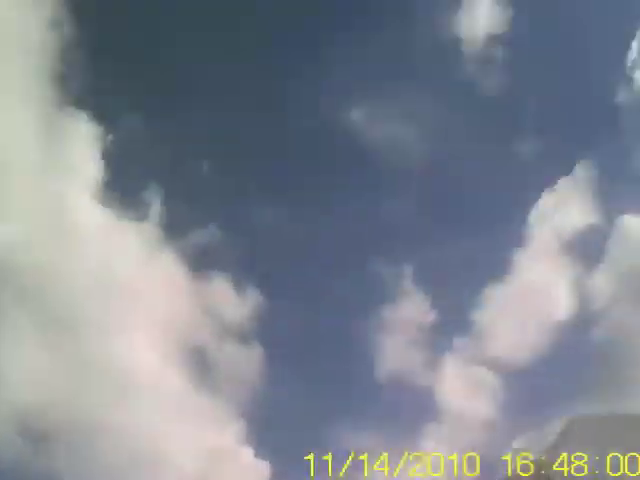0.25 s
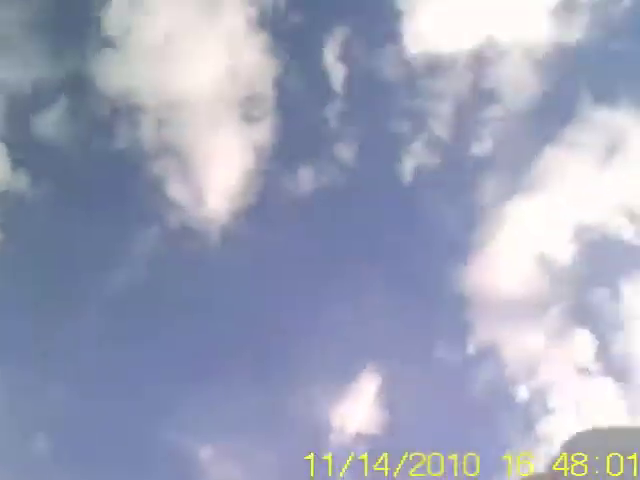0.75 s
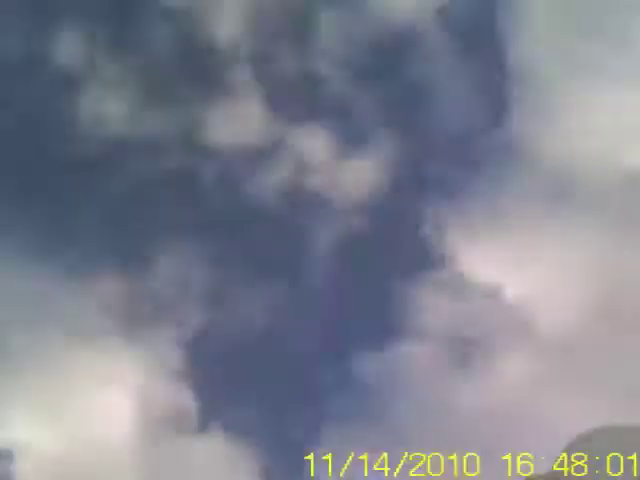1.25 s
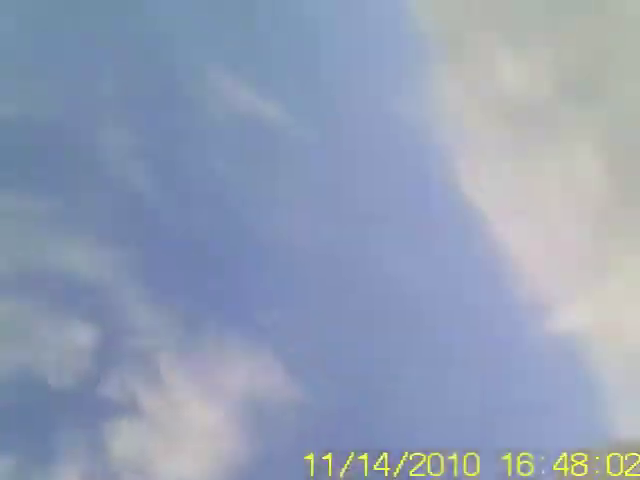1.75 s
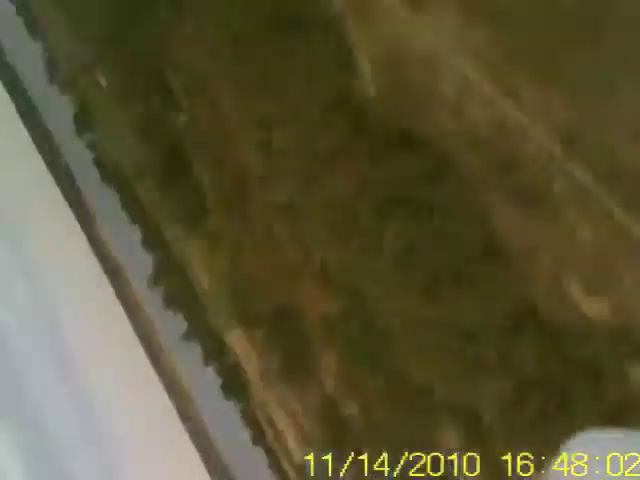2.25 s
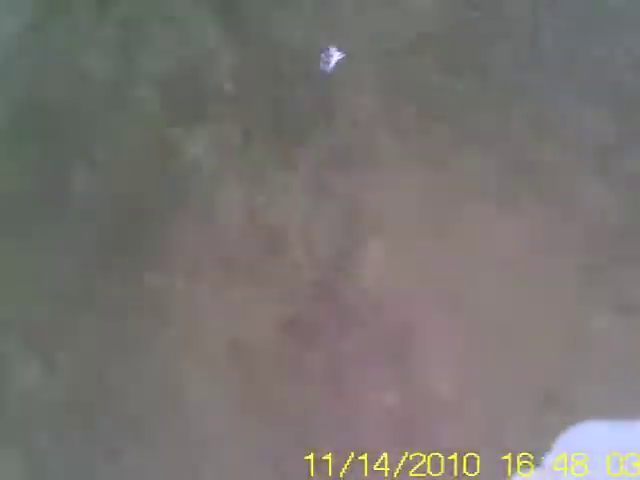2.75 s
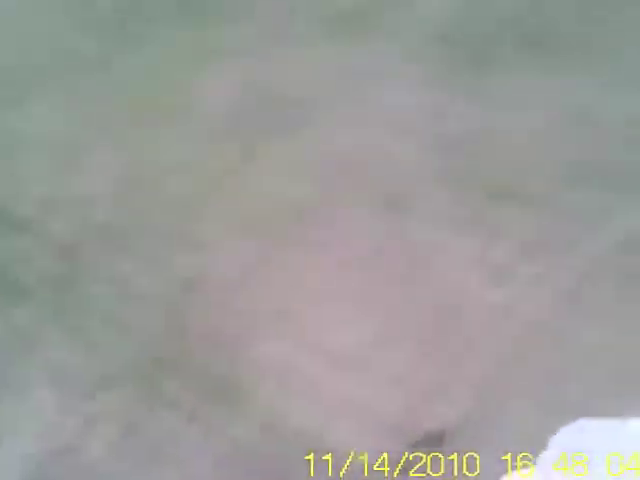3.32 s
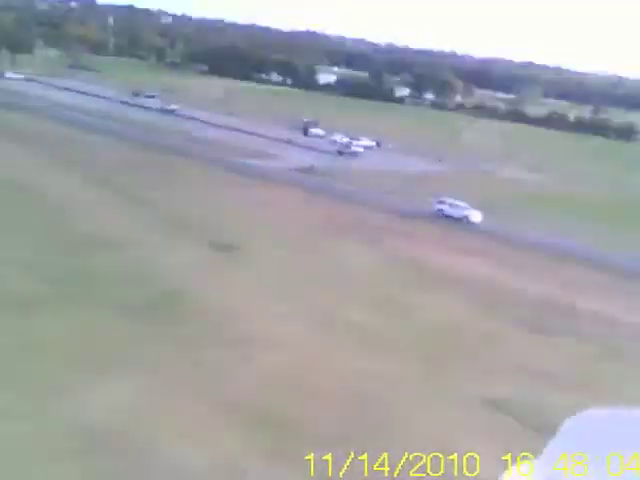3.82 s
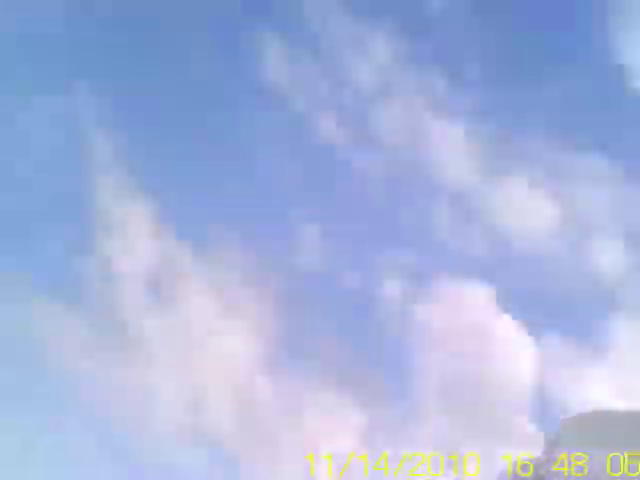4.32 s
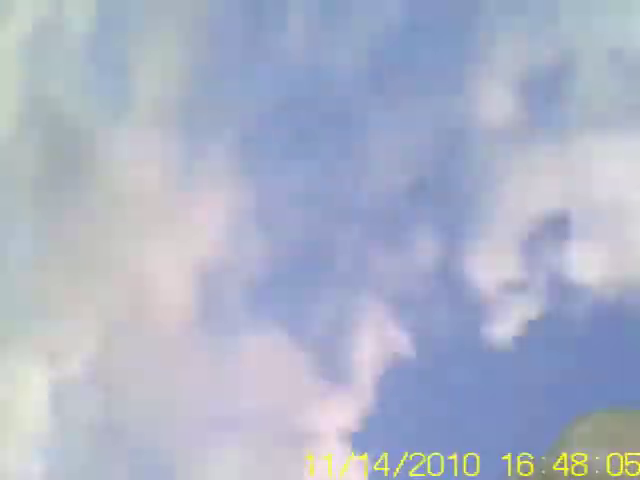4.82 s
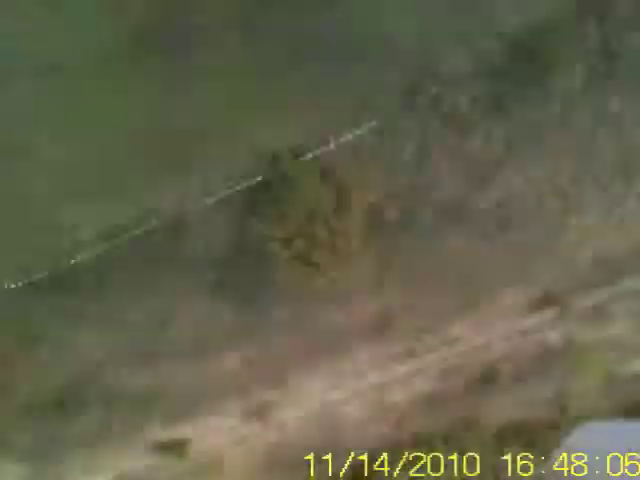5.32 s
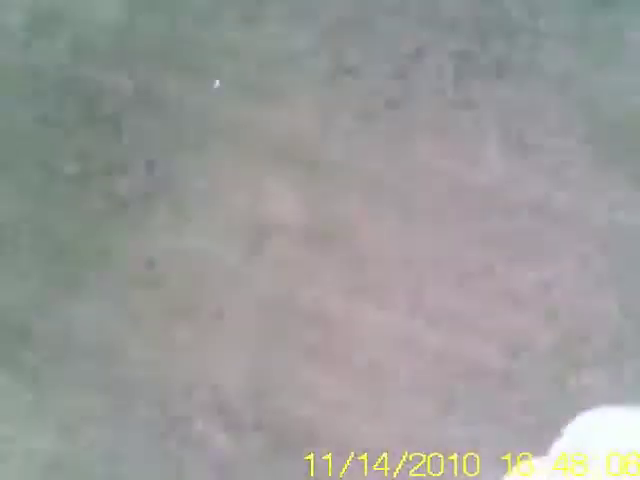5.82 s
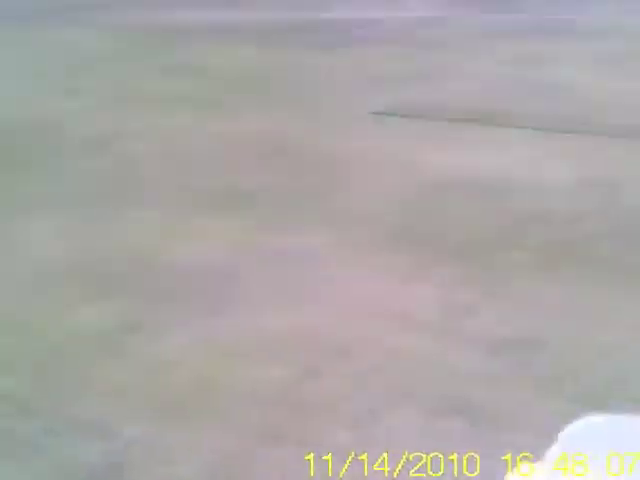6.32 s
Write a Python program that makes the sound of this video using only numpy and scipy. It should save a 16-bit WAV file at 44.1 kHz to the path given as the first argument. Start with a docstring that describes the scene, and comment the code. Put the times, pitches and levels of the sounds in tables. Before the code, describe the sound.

A small electric model plane's propeller whines at a steady pitch from the start, very close, with a hum beneath and a thin high tone above. The microphone rides on the aircraft in open air, with no echo. Wind rumbles and hisses over it, with soft thumps around 1 second. The wind eases near 2 seconds, then builds in a dive, with a faint airy whistle around 2.7 seconds. Gusts thump the microphone at about 3.1 and 3.4 seconds. At 3.5 seconds the whole sound abruptly drops to a faint whine and rush of air. It creeps up slowly from there but stays much quieter than the opening. Soft swells of wind and brief hollow moans of airflow pass between 4.5 and 5.5 seconds. The motor's pitch sags slightly near 6 seconds, then rises a little until the end at about 6.5 seconds.

```python
"""A two-blade propeller whines close by, its controller singing thinly: the microphone rides on a small
electric model jet flying loops in open air. Wind buffets the microphone and rushes over the airframe,
rising with airspeed in each dive; now and then an edge whistles or the flow breaks away and moans.
A gust hits halfway through; right after it the level drops abruptly, then creeps back as the motor runs."""
import sys
import numpy as np
from scipy import signal
from scipy.fft import rfft, irfft, next_fast_len
from scipy.io import wavfile

SR = 44100
rng = np.random.default_rng(int(sys.argv[2]) if len(sys.argv) > 2 else 0)


def digitize_waveform(pressure):
    """Quantize a signal to 16-bit integers and store it at the path in sys.argv[1].

    Rows of a 2-D input are taken as channels; values are limited to [-1, 1].
    """
    field = np.atleast_2d(pressure).T
    bounded = np.clip(field, -1, 1)
    quanta = np.round(bounded * 32767).astype(np.int16)
    wavfile.write(sys.argv[1], SR, quanta)


N = 289296
TIME = np.arange(N) / SR
CRUISE_AIRSPEED = 0.8  # airspeed is a share of the fastest dive


def from_db(db):
    """Decibels to gain."""
    return 10 ** (np.asarray(db) / 20)


def rms_one(x):
    """Scale to unit power."""
    return x / np.sqrt(np.mean(x ** 2) + 1e-20)


def in_time(rows):
    """A curve of (t/s, value), sample by sample."""
    return np.interp(TIME, *np.transpose(rows))


def swell(t, spread):
    """A bell-shaped rise and fall around time t."""
    return np.exp(-((TIME - t) / spread) ** 2 / 2)


def drift(rate_hz):
    """Slow random wander with a spread of one."""
    hop, settle = 40, 2000
    pole = np.exp(-2 * np.pi * rate_hz * hop / SR)
    white = rng.standard_normal(N // hop + settle + 2)
    slow = signal.lfilter([1], [1, -2 * pole, pole * pole], white)[settle:]
    return np.interp(np.arange(N) / hop, np.arange(len(slow)), rms_one(slow))


def turbulence(colour):
    """Noise of a given colour, unit power."""
    hz, db = np.transpose(colour)
    size = next_fast_len(N)
    bins = np.maximum(np.fft.rfftfreq(size, 1 / SR), 1)
    gain = from_db(np.interp(np.log(bins), np.log(hz), db))
    return rms_one(irfft(rfft(rng.standard_normal(size)) * gain, size)[:N])


def narrow_noise(hz, width_hz):
    """Noise gathered around a moving centre, unit power."""
    lowpass = signal.butter(2, width_hz / 2, fs=SR, output="sos")
    a, b = signal.sosfilt(lowpass, rng.standard_normal((2, N)))
    phase = 2 * np.pi * np.cumsum(hz) / SR
    return rms_one(a * np.cos(phase) + b * np.sin(phase))


# Balance on board: layer -> (level/dB at cruise, slope/dB per unit of airspeed)
SPEED_LAWS = {"whine": (-24.5, 1), "hum": (-31.5, 0), "overtones": (2.5, 8), "buffet": (-26.5, 27),
              "rush": (-35, 24), "wash": (-32, 13.5), "blade hiss": (-47, -6), "slipstream": (-47, 42)}

def level_db_at(layer, airspeed):
    """A layer's level at a given airspeed."""
    cruise_db, slope_db = SPEED_LAWS[layer]
    return cruise_db + slope_db * (airspeed - CRUISE_AIRSPEED)


# Partials trade places: shaft multiple -> (slope/dB per unit of airspeed, level/dB added at full throttle)
PARTIAL_LAWS = {1: (-6, -1), 2: (20.4, 0.75), 4: (-9, 2), 6: (12.2, 1.8), 7: (9.1, 11), 8: (6, 8.7),
                9: (-1.8, 6), 10: (-9, 2), 11: (8.5, -3), 12: (3.6, 0.5), 13: (8.4, 2), 14: (0, -26),
                16: (1, -8), 18: (1, 2.9), 20: (5, 9), 22: (7, 6), 24: (2, 4), 32: (-3, 1), 34: (-2, -2)}
# Some also swell and fade by themselves: shaft multiple -> rows of (t/s, added level/dB)
PARTIAL_SWELLS = {1: [(0, -2.5), (1, -0.5), (1.9, 1), (3.4, -1.5), (4.7, 2), (5.02, 5), (5.5, -3),
                  (5.8, 4.5), (6.56, -4)], 2: [(0, -2.5), (.8, -1), (1.6, 5), (2.45, -3.5), (3.2, 0),
                  (4.4, 2.5), (4.7, -4), (5.1, 5.5), (6, -7.5), (6.4, 1.5)], 3: [(0, 0.5), (1.2, 0.5),
                  (2.9, 2), (3.3, -13), (4.1, -6), (5.2, -5.5), (6.56, -3.5)], 4: [(0, 2.5), (1.6, -3),
                  (2.5, 1), (3.3, 2.5), (3.7, 0.5), (5.3, -2), (5.7, 3), (6.56, 0.5)], 8: [(0, -1),
                  (.28, -15), (.7, -0.5), (1.9, 3.5), (3.05, -5), (3.3, 1), (4.4, -1.5), (4.75, -10),
                  (5.3, -1), (5.58, -12), (5.9, -4), (6.56, 0.5)], 10: [(0, -2), (.5, .5), (1.3, 1.5),
                  (2.3, 0.5), (3.8, -3), (4.7, 0), (5.3, 0.5), (5.9, 2), (6.4, -5)], 12: [(0, -0.5),
                  (1.1, 2), (1.7, -2.5), (2.1, 2), (3.9, -1), (5.6, 2.5), (6.3, -2.5)]}

def rotor_tones(angle, orders, airspeed, throttle, waver_db, upper_waver_db, flutter, smear):
    """A pressure pulse of shaft harmonics, smeared by the airframe; uneven inflow makes each waver."""
    windmill_db = 12 * np.maximum(-throttle, 0)  # throttled back, the air drives the blades and they buzz
    bright_db = level_db_at("overtones", airspeed) + windmill_db
    out = np.zeros(N)
    for multiple, db in orders:
        k = round(multiple)
        upper = np.exp(-((k - 23) / 5) ** 2)  # picks out the upper overtones
        speed_db, throttle_db = PARTIAL_LAWS.get(k, (0, 0))
        level_db = db + upper * bright_db
        level_db += speed_db * (airspeed - CRUISE_AIRSPEED) + throttle_db * np.maximum(throttle, 0)
        level_db += (waver_db + upper * upper_waver_db) * drift(1.8)
        if k in PARTIAL_SWELLS:
            level_db += in_time(PARTIAL_SWELLS[k])
        lag = smear * k ** 2 * (k < 20)  # the highest orders come straight from the tips, unsmeared
        phase = k * angle - lag + flutter * drift(21)
        out += np.sqrt(2) * from_db(level_db) * (1 + flutter * drift(20)) * np.cos(phase)
    return out


# Blade whine and unbalance hum, close to the microphone: (shaft multiple, relative level/dB)
BLADE_ORDERS = [(2, -5.5), (4, -2), (6, -1), (8, -6.5), (10, -1.4), (12, -6), (14, -4.5), (16, -16.5),
                (18, -27), (20, -37.5), (22, -29.5), (24, -32.5), (26, -32.5), (28, -36.5), (30, -35),
                (32, -25.5), (34, -24.5), (36, -31.5), (38, -37.5), (40, -48.5)]
UNBALANCE_ORDERS = [(1, -1.5), (3, -4), (5, -10), (7, -15.5), (9, -12.5), (11, -11.5), (13, -17), (15, -28),
                    (17, -30.5), (19, -27), (21, -28.5)]

def propeller(angle, airspeed, throttle):
    """Two blades give the even orders, unbalance the odd ones; fast flight roughens both."""
    whine = rotor_tones(angle, BLADE_ORDERS, airspeed, throttle,
                        waver_db=0.61, upper_waver_db=2.5, flutter=0.055 * airspeed ** 2, smear=0.1157)
    hum = rotor_tones(angle, UNBALANCE_ORDERS, airspeed, throttle,
                      waver_db=0.77, upper_waver_db=0.3, flutter=0.025 * airspeed ** 2, smear=0.24)
    return from_db(level_db_at("whine", airspeed)) * whine + from_db(level_db_at("hum", airspeed)) * hum


# The thin tone from the motor, close by: (t/s, level/dB)
CONTROLLER_LEVEL = [(0, -47), (.5, -50.5), (.65, -46), (2.45, -46.5), (2.62, -50), (3.1, -47), (4.75, -46),
                    (4.95, -46), (6.0, -46), (6.3, -51)]

def controller(switching_hz=7607):
    """The speed controller switches at a steady rate and makes the windings sing."""
    level_db = in_time(CONTROLLER_LEVEL) + 0.6 * drift(5.6)
    return np.sqrt(2) * from_db(level_db) * np.sin(2 * np.pi * switching_hz * TIME)


# Rough or calm air along the path: (t/s, spread/s, added buffet level/dB, added rush level/dB)
ROUGH_AIR = [(.47, 0.069, 5, 4.5), (1.02, 0.13, 4.5, 3), (1.24, 0.12, 3.5, 5), (1.76, .12, -3.5, -6),
             (2.25, .12, 2, -3.5), (2.78, 0.14, 3.5, 0), (3.145, 0.068, 3.5, 1.5), (3.897, 0.2, 6.5, 4),
             (4.622, 0.13, -3, 3), (4.98, 0.14, 2, 9), (5.25, 0.088, 4, -3.5), (5.53, 0.088, 1, 8.5),
             (5.9, 0.12, -2, -1.5), (6.376, 0.1, 5.5, -0.5)]
# Wind right on the microphone, and on the airframe around it: (f/Hz, relative level/dB)
BUFFET_COLOUR = [(12, 6), (25, -8.5), (45, -6.5), (85, -10), (150, -15), (300, -34), (700, -74)]
RUSH_COLOUR = [(50, -9), (110, -4.5), (170, 1.5), (350, 0.5), (650, -3.5), (1200, -9.5), (2000, -65),
               (4000, -47)]

def wind(airspeed):
    """Lumpy air buffets the microphone and rushes over the airframe, louder in each dive."""
    buffet_db = level_db_at("buffet", airspeed)
    rush_db = level_db_at("rush", airspeed)
    for t, spread, extra_buffet_db, extra_rush_db in ROUGH_AIR:
        buffet_db += extra_buffet_db * swell(t, spread)
        rush_db += extra_rush_db * swell(t, spread)
    buffet = from_db(buffet_db + 1.2 * drift(24)) * turbulence(BUFFET_COLOUR)
    rush = from_db(rush_db + 0.94 * drift(23)) * turbulence(RUSH_COLOUR)
    return buffet + rush


def puffs(angle, depth):
    """One puff as each blade passes, unit power."""
    return np.exp(depth * np.cos(2 * angle)) / np.sqrt(np.i0(2 * depth))


# Air off the blades, at close range: (f/Hz, relative level/dB)
WASH_COLOUR = [(400, -2), (1000, -2), (1600, 0.5), (2200, 3), (2700, -1), (3200, 1.5), (3750, -3),
               (4300, -12.5), (5500, -28.5), (10000, -48)]
BLADE_HISS_COLOUR = [(3000, -33), (4500, -20), (5200, -3), (6050, 7), (6900, -1), (7450, -4.5), (8300, 4),
                     (9100, 6), (10000, -17), (11000, -16)]
SLIPSTREAM_COLOUR = [(3000, -11), (4400, 1.5), (5200, 1.5), (6100, 5.5), (7300, -4), (8300, 2.5),
                     (9100, -4.5), (10000, -13), (11000, -27)]

def propeller_air(angle, airspeed):
    """Wash that pulses under load, hiss chopped by the blades, and the smooth hiss of the slipstream."""
    load = np.clip((1.08 - airspeed) / 1.6, 0.03, 0.98)  # the blades bite hardest in slow flight
    wash_db = level_db_at("wash", airspeed) + 0.38 * drift(22)
    wash = from_db(wash_db) * turbulence(WASH_COLOUR) * puffs(angle, depth=0.071 * load)
    hiss_db = level_db_at("blade hiss", airspeed) + 1.4 * drift(24)
    hiss = from_db(hiss_db) * turbulence(BLADE_HISS_COLOUR) * puffs(angle, depth=0.74)
    slipstream = from_db(level_db_at("slipstream", airspeed)) * turbulence(SLIPSTREAM_COLOUR)
    return wash + hiss + slipstream


# A nearby edge catches the flow: (t/s, spread/s, relative level/dB)
WHISTLES = [(.28, 0.19, -6), (2.72, 0.24, -3.5), (5.547, .08, -9)]

def edge_whistle(airspeed, top_hz=11000, level_db=-46):
    """Vortices shed from a thin edge: an airy whistle whose pitch follows airspeed."""
    strength = sum(from_db(level_db + db) * swell(t, spread) for t, spread, db in WHISTLES)
    return strength * narrow_noise(top_hz * airspeed, width_hz=500)


# Gusts straight onto the microphone: (start t/s, end t/s, pressure/full scale)
GUSTS = [(0.913, 0.946, 0.11), (1.025, 1.085, -0.12), (3.132, 3.152, 0.22), (3.416, 3.454, -0.35)]

def gusts(soften_hz=90):
    """Rounded steps of pressure on the diaphragm."""
    pressure = sum(push * ((TIME > start) & (TIME < end)) for start, end, push in GUSTS)
    return signal.sosfilt(signal.butter(1, soften_hz, fs=SR, output="sos"), pressure + 1e-18)


# Moans on the airframe: (t/s, spread/s, centre f/Hz, glide/octaves per s, level/dB)
MOANS = [(1.23, 0.14, 220.3, 0, -35), (4.55, 0.09, 681, -1, -25.5), (4.91, 0.1, 166.8, -1.8, -21),
         (5.529, 0.072, 230, 1.27, -29)]

def moans():
    """Short hollow glides where the flow breaks away from the airframe."""
    out = np.zeros(N)
    for t, spread, hz, glide, db in MOANS:
        centre_hz = hz * 2 ** np.clip(glide * (TIME - t), -1, 1)
        out += from_db(db) * swell(t, spread) * narrow_noise(centre_hz, width_hz=0.6 * hz)
    return out


# The loops, slow over the top and fast in the dive: (t/s, airspeed/fastest dive)
FLIGHT = [(0, 0.97), (.4, 0.77), (.7, 0.69), (1.15, 0.64), (1.7, 0.54), (2.1, 0.57), (2.55, .73),
          (2.95, 0.91), (3.35, 0.96), (3.6, 0.99), (4.55, 1.0), (4.9, 0.82), (5.25, 0.65), (5.45, 0.85),
          (5.7, 1), (5.95, 1), (6.2, .88), (6.56, 0.91)]
# Turning rate of the motor shaft: (t/s, f/Hz)
SHAFT = [(0.0, 268.8), (0.1, 266.7), (0.54, 266.4), (0.72, 267.9), (1.12, 267.7), (1.91, 268.1),
         (2.28, 267.7), (3.17, 267.4), (3.84, 268.4), (4.6, 267.7), (4.67, 266.5), (5.18, 265.7),
         (5.21, 266.9), (5.69, 266.2), (5.92, 263.0), (6.11, 264.4), (6.39, 271.3), (6.56, 280.7)]
CRUISE_SHAFT_HZ, FULL_SHAFT_HZ = 268, 278

def scene():
    """One microphone on the same airframe as every source, in open air with no echo."""
    airspeed, shaft_hz = in_time(FLIGHT), in_time(SHAFT)
    throttle = (shaft_hz - CRUISE_SHAFT_HZ) / (FULL_SHAFT_HZ - CRUISE_SHAFT_HZ)
    hunting = 0.00051 * airspeed ** 2 * drift(10.3)  # the shaft hunts in fast air
    angle = 2 * np.pi * np.cumsum(shaft_hz * (1 + hunting)) / SR
    motor = propeller(angle, airspeed, throttle) + controller()
    air = wind(airspeed) + propeller_air(angle, airspeed) + edge_whistle(airspeed) + gusts() + moans()
    return (motor + air)[None, :]


def record(dry):
    """Peaks are clipped, the level drops at once and creeps back, the top is cut."""
    drop_s, drop_db, recovery_db_per_s = 3.455, -30, 3
    level_db = np.where(TIME > drop_s, drop_db + recovery_db_per_s * (TIME - drop_s), 0)
    clipped = np.clip(dry, -0.72, 0.72)
    lowpass = signal.ellip(10, 0.1, 80, 10500, fs=SR, output="sos")
    return signal.sosfilt(lowpass, clipped * from_db(level_db))


dry = scene()
out = record(dry)
digitize_waveform(out)
```